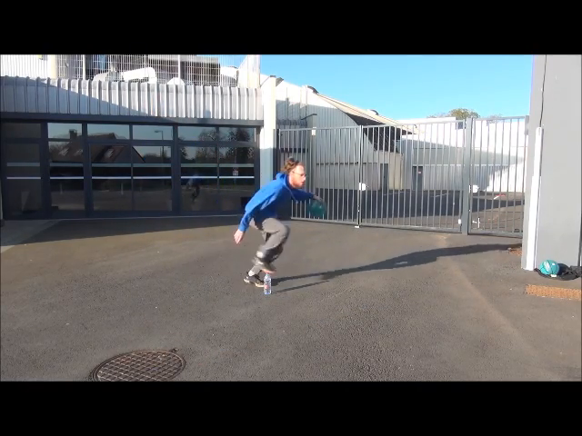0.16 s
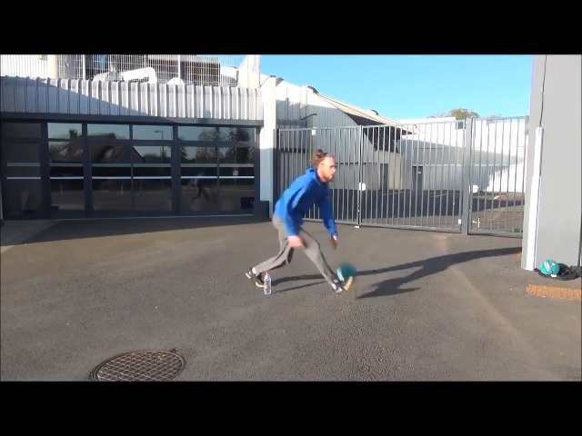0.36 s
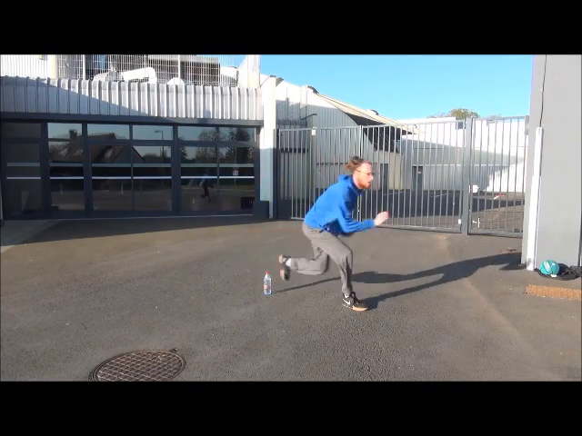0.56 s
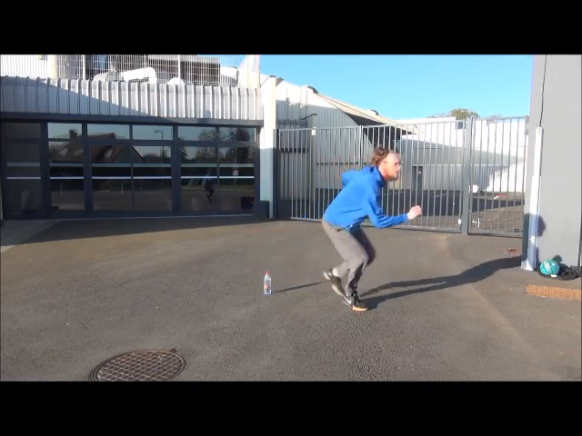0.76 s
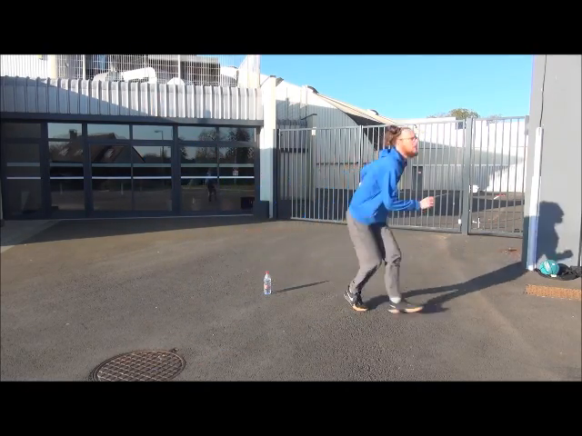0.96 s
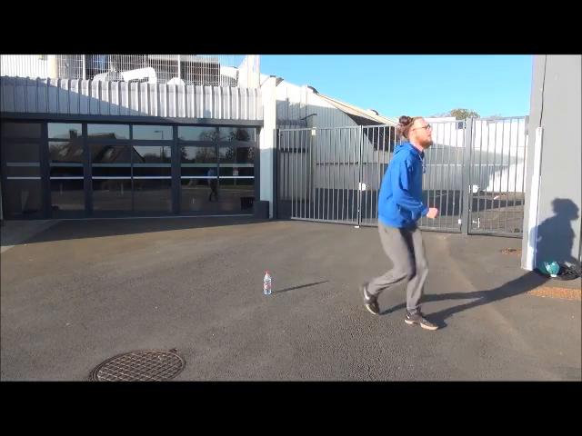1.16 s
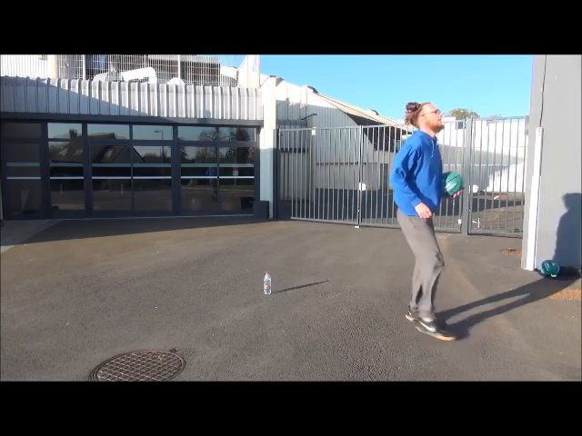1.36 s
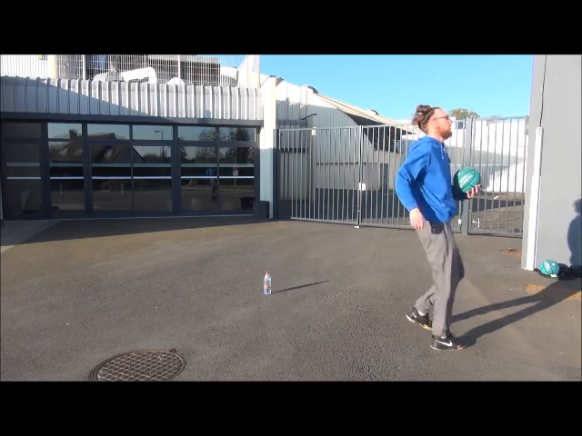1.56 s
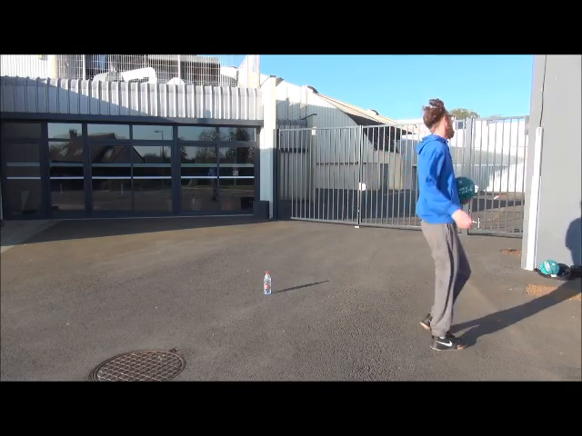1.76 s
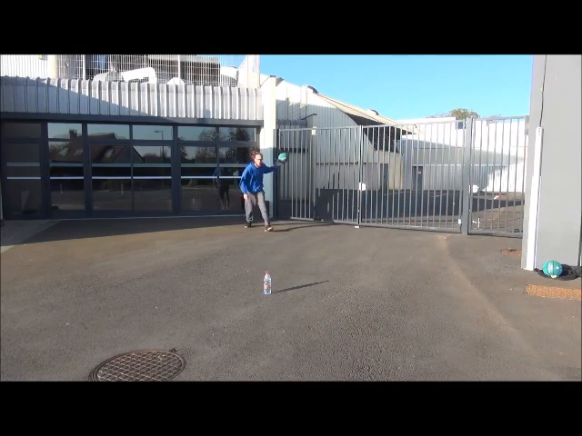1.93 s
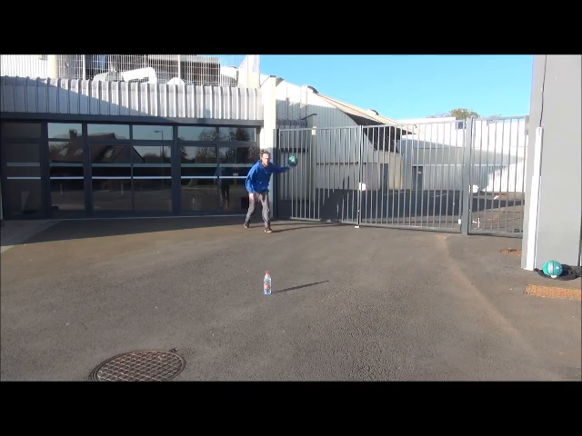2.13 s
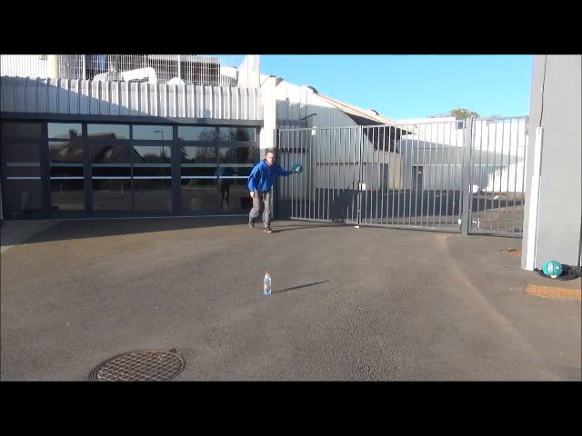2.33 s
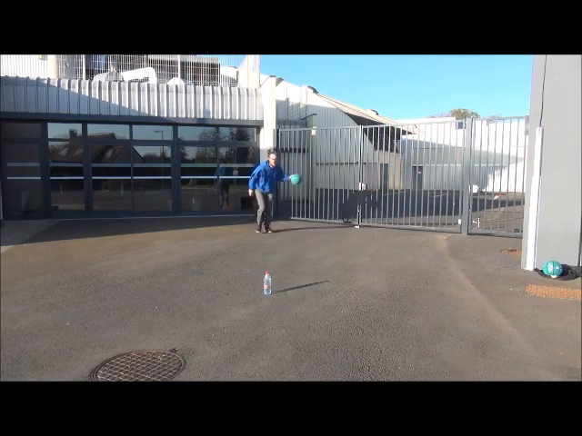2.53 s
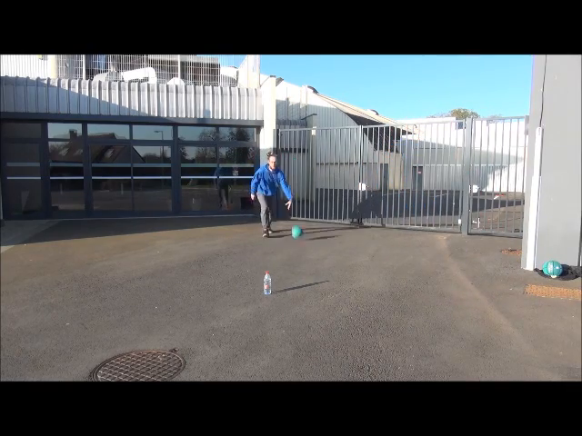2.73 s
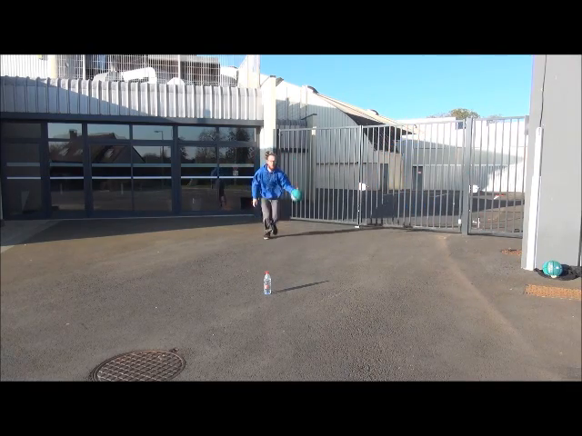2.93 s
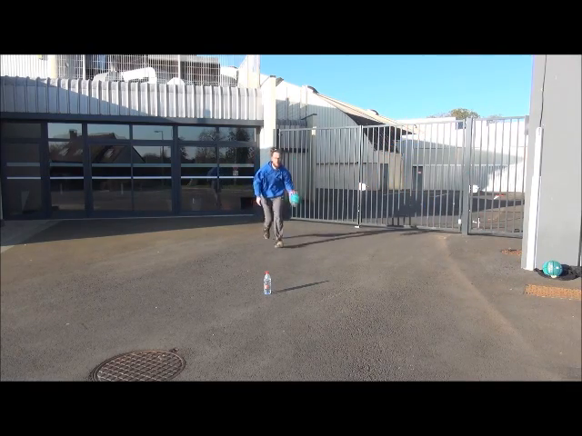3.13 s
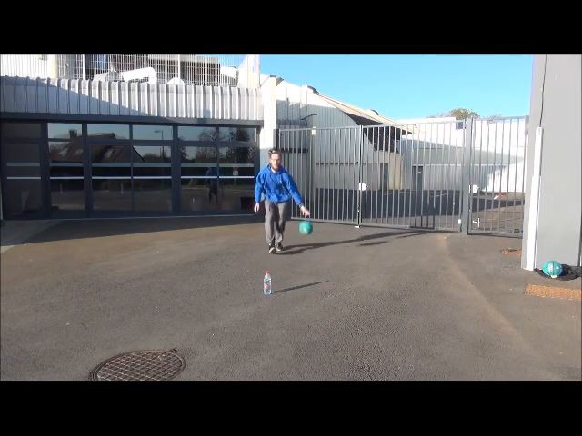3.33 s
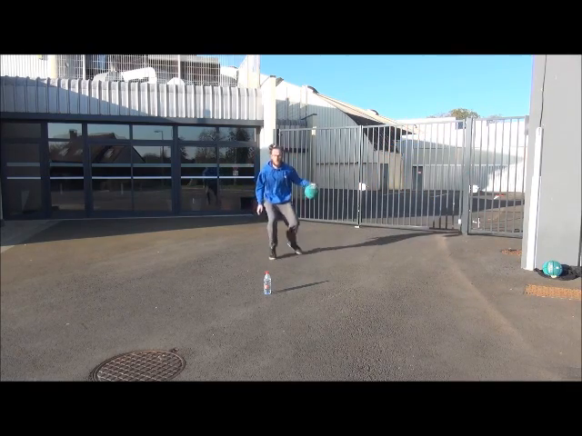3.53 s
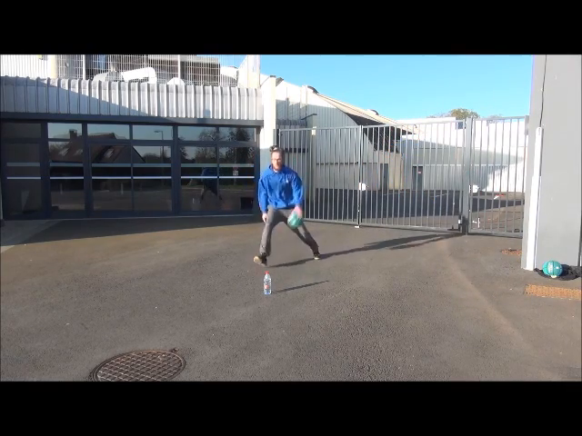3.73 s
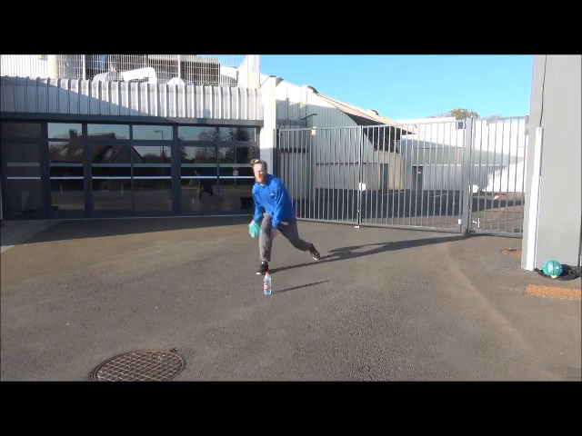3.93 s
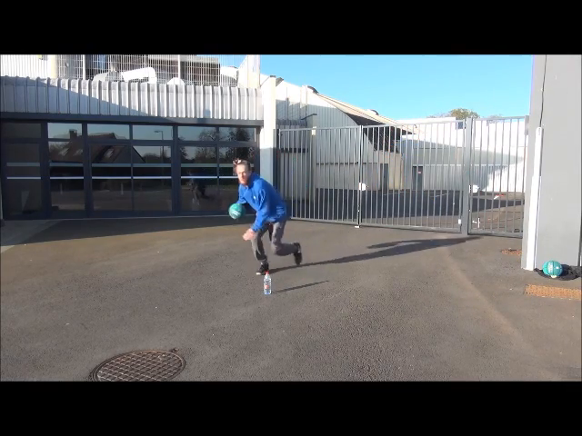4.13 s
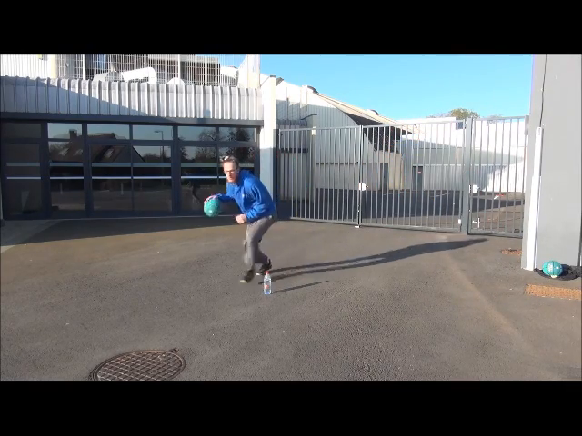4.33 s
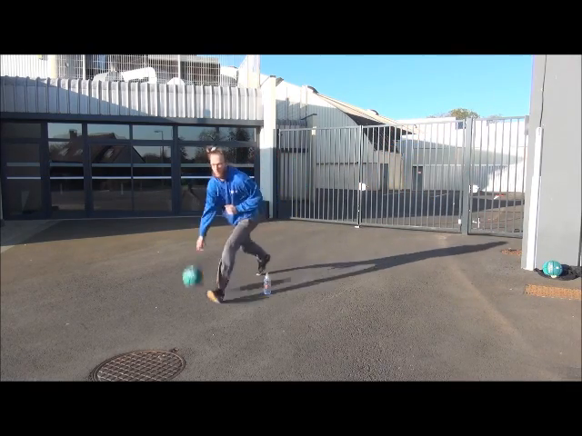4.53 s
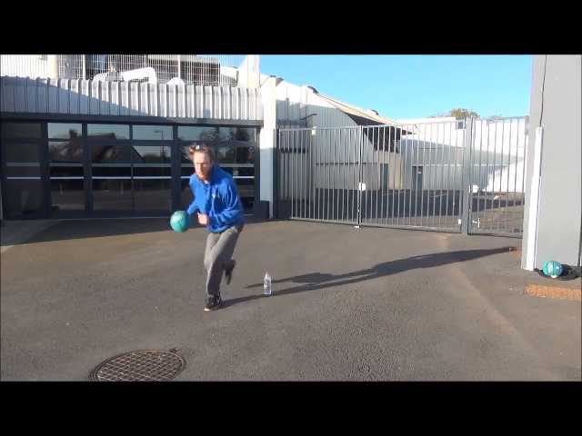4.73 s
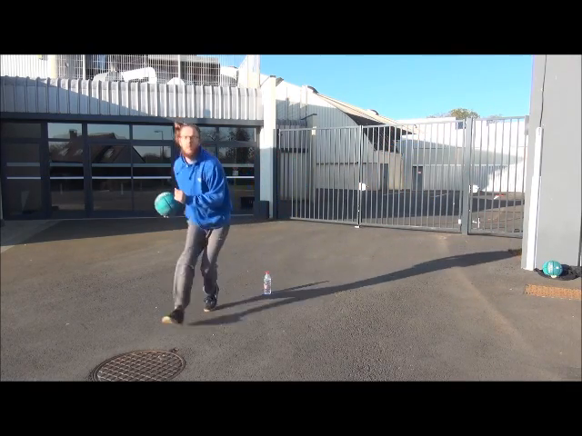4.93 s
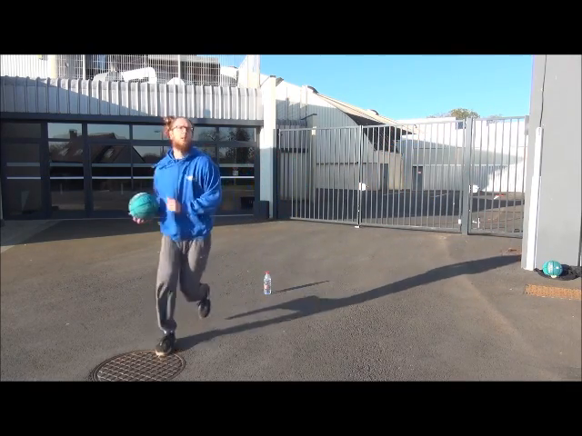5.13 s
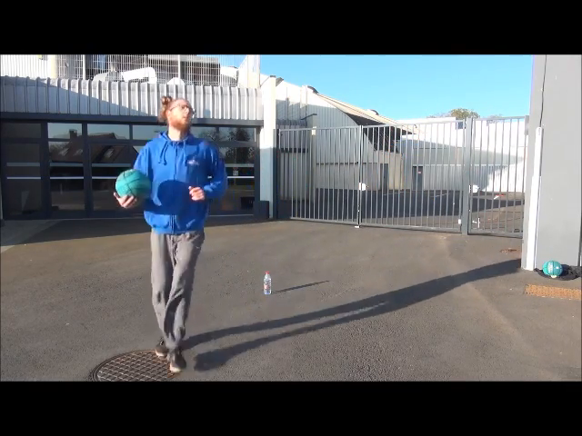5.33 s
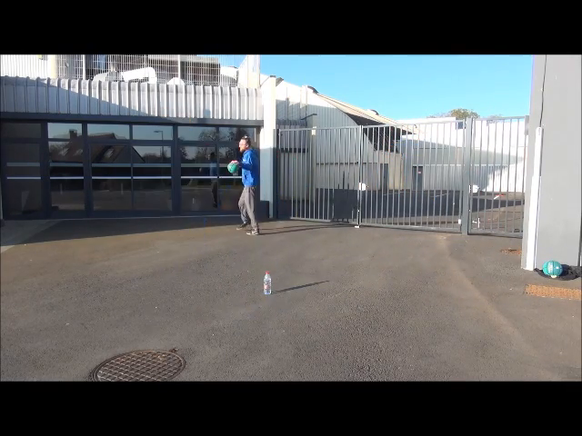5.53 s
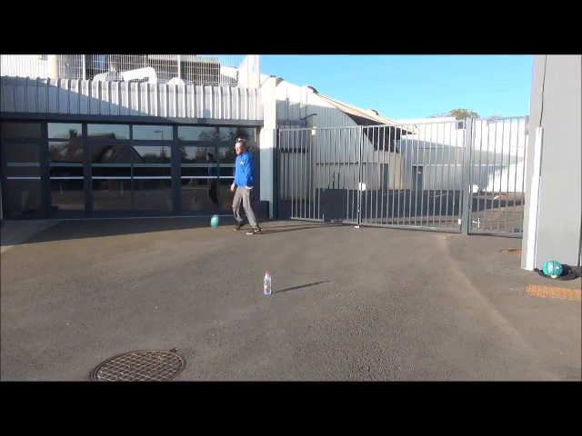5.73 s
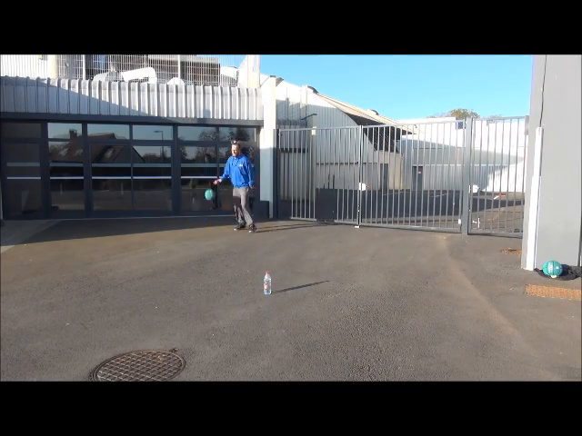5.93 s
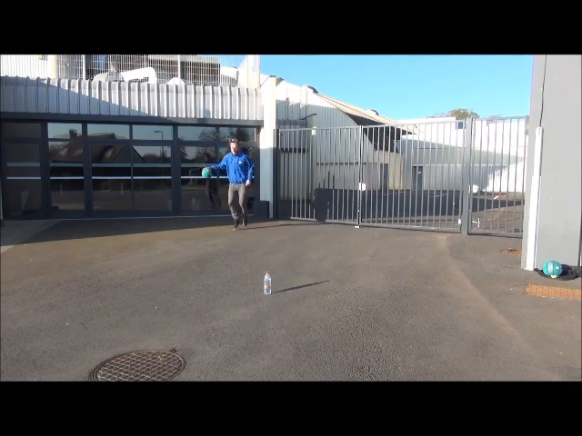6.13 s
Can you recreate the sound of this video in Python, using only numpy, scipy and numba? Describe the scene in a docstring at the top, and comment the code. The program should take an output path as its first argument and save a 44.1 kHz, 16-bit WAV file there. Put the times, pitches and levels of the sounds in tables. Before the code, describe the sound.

A ball is dribbled hard and unevenly on asphalt in an echoing yard, with shoes treading, scraping and briefly squeaking.

```python
"""Basketball in a yard

A basketball is dribbled hard on asphalt. Each bounce slaps, thumps and rings, then echoes from
a barred gate, a glass wall and far buildings. Shoes tread, scrape on grit and squeak. Behind them
a town murmurs, a fan hums and light wind touches the microphone. A limiter flattens the slaps."""
import sys
import numpy as np
from scipy import signal
from scipy.fft import rfft, irfft
from scipy.io import wavfile
from scipy.ndimage import uniform_filter1d
from numba import njit

SR = 44100
rng = np.random.default_rng(int(sys.argv[2]) if len(sys.argv) > 2 else 0)


def pcm_store(signal):
    """Save signal as 16-bit PCM."""
    levels = np.round(np.clip(np.atleast_2d(signal), -1, 1) * 32767)
    wavfile.write(sys.argv[1], SR, levels.astype(np.int16).T)


N = 276948
TIME = np.arange(N) / SR
ONE_SECOND = TIME[:SR]

# Tone curves: how strong the low and high parts of a sound are.
# Each row: frequency in Hz, relative level in dB.
TOWN_TONE = [(15, -49), (25, -34), (59, -18), (112, -15), (145, -14), (169, -7), (336, -4), (391, -7.5),
             (545, -4.5), (930, -5.5), (2270, -11.5), (3320, -12.5), (4180, -16.5), (5530, -19),
             (11000, -33.5), (14300, -114), (22000, -120)]  # distant traffic
RUSH_TONE = [(25, -8), (70, -10.5), (140, 3.5), (240, 0), (400, -9.5), (1000, -30.5), (4000, -46)]  # wind rushing past
BUFFET_TONE = [(25, -14), (45, -9), (75, -1), (105, 0.5), (160, -25), (500, -46)]  # air swirling on the microphone
YARD_TONE = [(60, -19), (130, 11), (250, 0.5), (500, -2.5), (1000, -2.5), (2000, -3.5), (4000, -2.5),
             (7000, -4), (11000, 0.5)]  # the blended echoes of the yard
FAR_TONE = [(150, -2), (500, -16), (740, 4.5), (950, -8), (1270, 4.5), (1700, -3.5), (2500, -12.5),
            (8000, -15.5)]  # the echo from far buildings
GATE_TONE = [(200, -22), (1000, 2), (2500, 2), (4000, 1.5), (8000, 4.5), (11000, 5.5)]  # the echo from the gate's bars
SOLE_TONE = [(40, -7), (120, 14), (260, 11), (500, -8), (1200, -23), (4000, -42)]  # a shoe landing
SCRAPE_TONE = [(100, -36), (300, -19.5), (480, 2.5), (620, -1), (1200, 2.5), (2000, 1.5), (4000, -4),
               (7000, -14), (11000, -25.5)]  # grit under a shoe
SLAP_TONE = [(150, -55), (500, -10), (1300, 6.5), (2400, 0.5), (4000, -2.5), (6000, -16), (8000, -18.5),
             (11000, -22), (16000, -58)]  # rubber hitting asphalt
CRUNCH_TONE = [(40, -22), (120, -24), (300, 6), (800, 3), (1400, -7.5), (2500, -6.5), (4000, -18.5),
               (7000, -26.5), (11000, -37)]  # grit under the ball
ALL_ROUND_TONE = [(50, -18), (130, 1), (260, 0.5), (400, -3), (550, -3), (780, 4), (980, 2.5), (1260, 1),
                  (1700, -2.5), (2900, -7.5), (4000, -11), (7000, -12), (11000, -34)]  # the ball, averaged over all directions
FRAME_TONE = [(200, -16), (1200, -1.0), (4000, -5.0), (11000, 0.5)]  # echo from the window frames
RECESS_TONE = [(100, 2.5), (300, 1.5), (1200, -7.5), (4000, -25.5), (11000, -28)]  # the wall's recess

# How much two close microphones differ. Each row: frequency in Hz, unshared against shared sound in dB.
STEREO_DIFFERENCE = [(60, -13.5), (500, -14), (2000, -16.5), (4000, -17), (8000, -6), (11000, -7)]
# How long the yard echoes. Each row: frequency in Hz, seconds to fade by 60 dB.
YARD_FADE = [(100, 0.72), (400, 2.44), (1200, 1.28), (4000, 0.89), (10000, 0.76)]
# Gusts of wind. Each row: peak time in seconds, half width in seconds, rush in dB, buffeting in dB.
WIND_GUSTS = [(0.88, 0.097, -49.5, -59), (1.47, 0.14, -44.5, -66), (2.7, 0.06, -46.5, -66),
              (4.25, 0.46, -43.5, -48), (4.73, 0.11, -45, -42.5), (5.6, 0.043, -37, -52),
              (5.77, 0.11, -36.5, -48), (6.13, 0.14, -42, -54)]
# Dull low bumps. Each row: start in seconds, length in seconds, pitch in Hz, level in dB.
LOW_BUMPS = [(5.548, 0.022, 164, -28.5), (5.572, 0.042, 169, -27.5)]

# Three stretches of the scene. "Pan" means left level minus right level.
# Each row: start in seconds, the shoes' starting pan in dB, its drift in dB per second, town level in dB.
STRETCHES = [(0, -1, -3, -45), (1.95, 1, 0.5, -47), (5.52, 1.5, -1, -44.5)]
# Footfalls and catches. Each row: start in seconds, thud level in dB, grit level in dB.
FOOTFALLS = [(0.408, -38, -66), (1.132, -37.5, -44), (1.51, -35.5, -40), (2.128, -37.5, -64),
             (3.684, -45.5, -36.5), (3.89, -33, -42), (4.591, -12.5, -36), (5.112, -27.5, -30.5),
             (5.529, -25, -44)]
# Soles sliding on grit. Each row: peak time, rise and fall in seconds, level in dB,
# brightness in dB per octave.
SHOE_SLIDES = [(0.19, 0.059, 0.018, -45, 4), (1.62, .004, 0.06, -29, -3), (1.663, .01, .025, -31, -0.5),
               (1.712, 0.016, 0.075, -32.5, -1), (1.795, .012, 0.035, -32.5, -6),
               (1.87, .03, 0.058, -41, -2), (3.19, 0.0029, 0.025, -42.5, 17),
               (3.237, 0.0043, 0.009, -34.5, 14), (3.471, 0.0045, 0.0075, -40, 16),
               (4.129, 0.022, 0.019, -37.5, 5.5), (5.119, 0.0036, 0.017, -42.5, 18),
               (5.252, 0.00092, 0.0028, -39.5, 8), (5.78, .06, 0.059, -53.5, 10)]
# Rubber squeaks. Each row: start and length in seconds, first and last pitch in Hz,
# roughness from 0 to 1, level in dB.
SHOE_SQUEAKS = [(1.236, 0.01, 1120, 950, 0.34, -37), (3.184, 0.046, 2960, 3220, 0.04, -42.5),
                (3.2, 0.039, 3400, 3640, .02, -46), (3.744, .011, 1050, 900, 0.37, -33.5),
                (4.119, 0.026, 1633, 1710, 0.27, -23.5)]

# The notes a ball rings with. Each row: pitch in Hz, relative level in dB, seconds to fade by 60 dB.
THUMP_NOTES = [(129.5, -23, 0.073), (200, -10.5, 0.04), (280, -16, 0.065), (380.5, -15.5, 0.051)]  # slow swings of the squashed ball
SHELL_NOTES = [(520, -43, 0.02), (669, -18, 0.05), (837, -10.5, 0.036), (1013, -4.5, 0.017),
               (1093, -20, 0.035), (1270, -10, 0.04), (1340, -23, 0.017), (1920, -48, .035),
               (2200, -74, 0.028), (4260, -10, 0.02)]  # the rubber shell
AIR_NOTES = [(990, -47, .5), (2890, -47.5, 2.4), (3210, -46, 0.33), (3526, -60, 1.2), (4000, -60, 0.91)]  # the air inside
# The bounces. Each row: start in seconds; relative levels in dB of the whole bounce, its thump, slap
# and air ring; gate, wall and far echo delays in seconds; relative far echo level in dB; pan in dB.
BALL_BOUNCES = [(0.463, -2, 0, -1.5, -7, 0.028, 0.048, 0.18, -19.5, -2.5),
                (2.8527, 1.5, -3.5, 0, -16, .0162, .0296, .2, -28, 2),
                (3.3579, 0, 3, -4, -22, .021, .0362, .205, -34.5, -2),
                (3.9286, 0.5, 4, -2, -6, 0.027, 0.044, 0.19, -26.5, 2),
                (4.5986, 0.5, 9.5, 3.5, 2, 0.048, .0505, .222, -33.5, 1.5),
                (5.8846, 0.5, -5, 4, -10, 0.015, .023, 0.2, -35.5, -2.5)]


def gain(db):
    """Turn decibels into a number to multiply by."""
    return 10 ** (np.asarray(db) / 20)


def stereo(pan_db):
    """Left and right gains; a positive pan is louder on the left."""
    return gain(np.array([[.5], [-.5]]) * pan_db)


def add(out, x, start_s):
    """Mix x into out from the given time on."""
    i = max(int(round(start_s * SR)), 0)
    out[..., i:i + x.shape[-1]] += x[..., :out.shape[-1] - i]


def lookup(curve, hz):
    """Read a curve between its rows, with octaves evenly spaced."""
    row_hz, values = np.transpose(curve)
    return np.interp(np.log(np.maximum(hz, 1)), np.log(row_hz), values)


def soft_filter(x, kind, hz):
    """Let through the "low" or the "high" side of a frequency."""
    return signal.sosfilt(signal.butter(2, hz, kind, fs=SR, output="sos"), x)


def colour(x, tone, size=2048):
    """Give x a tone curve, using a filter that leaves white noise equally strong."""
    cepstrum = irfft(np.log(gain(lookup(tone, np.fft.rfftfreq(size, 1 / SR)))))
    cepstrum[1:size // 2] *= 2  # folding this in half keeps the filter from ringing before a hit
    cepstrum[size // 2 + 1:] = 0
    response = irfft(np.exp(rfft(cepstrum)))
    return signal.fftconvolve(x, response / np.linalg.norm(response))[:len(x)]


def noise(tone, count=N):
    """Steady noise with a tone curve and a strength near 1."""
    return colour(rng.standard_normal(2 * SR + count)[SR:], tone)[-count:]


def burst(tone, fade_s):
    """Noise that starts suddenly and dies away."""
    return colour(rng.standard_normal(SR) * np.exp(-ONE_SECOND / fade_s), tone)


def grit(spread_db):
    """One second of dense, uneven clicks: small stones under rubber."""
    clicks = rng.standard_normal(SR) * gain(spread_db * np.minimum(rng.exponential(size=SR), 5))
    return clicks / np.sqrt(np.mean(clicks ** 2))


def wander(rate_hz):
    """Glide between random values, mostly within -1 to 1."""
    step = int(SR / rate_hz)
    return uniform_filter1d(np.repeat(rng.standard_normal(N // step + 1), step), step)[:N]


def swell(peak_s, width_s):
    """A smooth rise to 1 and back down."""
    return np.exp(-((TIME - peak_s) / width_s) ** 2)


def widen(shared, other):
    """Sound from all around differs between two close microphones mainly in the treble."""
    side = irfft(rfft(other) * gain(lookup(STEREO_DIFFERENCE, np.fft.rfftfreq(N, 1 / SR))), N)
    return np.array([shared + side, shared - side])


def stretches():
    """As each stretch starts, the shoes' left-right position and the town's loudness jump."""
    pan_db, town_db = np.zeros(N), np.zeros(N)
    for start_s, start_pan_db, drift_db_per_s, level_db in STRETCHES:
        now = TIME >= start_s
        pan_db[now] = start_pan_db + drift_db_per_s * (TIME[now] - start_s)
        town_db[now] = level_db
    return pan_db, town_db


def town(level_db):
    """Distant traffic blends into a gently wavering murmur."""
    return widen(noise(TOWN_TONE), noise(TOWN_TONE)) * gain(level_db + .6 * wander(6))


def fan(pitch_hz=138):
    """The blades of a distant fan hum faintly; the hum swells once."""
    hz = pitch_hz * (1 + .012 * wander(16))
    blades = np.sqrt(2) * np.sin(2 * np.pi * np.cumsum(hz) / SR)
    level = np.hypot(gain(-61), gain(-45) * swell(peak_s=4.32, width_s=0.66))
    return blades * level * gain(1.5 * wander(5))


def wind():
    """Gusts rush past and buffet the microphone."""
    rush_level, buffet_level = gain(-57), gain(-61)  # the calm between gusts
    for peak_s, width_s, rush_db, buffet_db in WIND_GUSTS:
        gust = swell(peak_s, width_s)
        rush_level = np.hypot(rush_level, gain(rush_db) * gust)
        buffet_level = np.hypot(buffet_level, gain(buffet_db) * gust)
    rush = widen(noise(RUSH_TONE), noise(RUSH_TONE)) * rush_level
    buffeting = widen(noise(BUFFET_TONE), noise(BUFFET_TONE)) * buffet_level
    puffs = gain(2 * wander(22))
    return stereo(0.48) * (rush + buffeting) * puffs


def low_bumps():
    """Soft low bumps, a few waves long, with no click."""
    out = np.zeros(N)
    for start_s, length_s, hz, db in LOW_BUMPS:
        count = int(length_s * SR)
        add(out, gain(db) * np.hanning(count) * np.sin(2 * np.pi * hz * TIME[:count]), start_s)
    return out


def yard_echoes(x, build_s=0.029, bands=9):
    """Countless echoes blend into a tail that lasts longest in the low middle range."""
    t, hz = TIME[:2 * SR], np.fft.rfftfreq(2 * SR, 1 / SR)
    centres_hz = np.geomspace(60, 12000, bands)
    early_boost = 1 + gain(-2.5) * np.exp(-t / 0.043)  # the nearest walls answer first and strongest
    build_up = 1 - np.exp(-(t / build_s) ** 2)
    echoes = []
    for _ in range(2):
        spectrum = rfft(noise(YARD_TONE, count=2 * SR))
        tail = np.zeros(2 * SR)
        for centre_hz, weights in zip(centres_hz, np.eye(bands)):
            band = irfft(spectrum * lookup(np.c_[centres_hz, weights], hz))
            tail += band * gain(-60 * t / lookup(YARD_FADE, centre_hz))
        echoes.append(signal.fftconvolve(x, gain(-52) * tail * early_boost * build_up)[:N])
    return widen(*echoes)


def scattered_echo(x, tone, fade_s):
    """An uneven surface sends back many small echoes close together."""
    response = burst(tone, fade_s)
    return signal.fftconvolve(x, response / np.linalg.norm(response))[:len(x)]


def wall_echo(hit, pulse, recess_delay_s=0.0062):
    """Glass mirrors the slap, the frames scatter it, and the bass returns later from a recess."""
    out = gain(-13) * hit + gain(-6.5) * scattered_echo(pulse, FRAME_TONE, fade_s=0.0039)
    add(out, gain(-16) * scattered_echo(pulse, RECESS_TONE, fade_s=0.0086), recess_delay_s)
    return out


def shoes():
    """Soles thud on the asphalt and drag loose grit over it."""
    out = np.zeros(N)
    for start_s, thud_db, grit_db in FOOTFALLS:
        thud = burst(SOLE_TONE, fade_s=0.0062)
        tick = colour(grit(spread_db=4) * np.exp(-ONE_SECOND / 0.0053), SCRAPE_TONE)
        add(out, gain(thud_db) * thud + gain(grit_db) * tick, start_s)
    for peak_s, rise_s, fall_s, db, brightness in SHOE_SLIDES:
        t = ONE_SECOND - 3 * rise_s  # zero at the loudest moment
        slide = np.where(t < 0, np.exp(-(t / rise_s) ** 2), np.exp(-abs(t) / fall_s))
        tone = [(hz, row_db + brightness * np.log2(hz)) for hz, row_db in SCRAPE_TONE]
        add(out, gain(db) * colour(grit(spread_db=4) * slide, tone), peak_s + t[0])
    return out


def squeaks():
    """A sole sticks and slips: evenly for a squeak, unevenly for a rasp."""
    out = np.zeros(N)
    for start_s, length_s, first_hz, last_hz, roughness, db in SHOE_SQUEAKS:
        count = int(length_s * SR)
        hz = np.linspace(first_hz, last_hz, count) * (1 + roughness * wander(1500)[:count])
        add(out, gain(db) * np.hanning(count) * np.sin(2 * np.pi * np.cumsum(hz) / SR), start_s)
    return out


def ring(notes, wave, detune):
    """Fading notes; detune sets how far each blow shifts their pitches by chance."""
    out = np.zeros(SR)
    for hz, db, fade_s in notes:
        pitch_hz = hz * (1 + detune * rng.standard_normal())
        out += gain(db - 60 * ONE_SECOND / fade_s) * wave(2 * np.pi * pitch_hz * ONE_SECOND)
    return out


def all_round_pulse(thump_db, slap_db):
    """The ball's tone differs with direction, so the yard as a whole gets a mostly smooth pulse."""
    tilt = [(250, thump_db), (900, 0), (2500, slap_db)]
    tone = [(hz, db + .5 * lookup(tilt, hz)) for hz, db in ALL_ROUND_TONE]
    return gain(18) * colour(signal.unit_impulse(SR), tone)


def bounce(thump_db, slap_db, air_db, contact_s=0.0102, sway_hz=7.3, sway_depth=0.74):
    """The ball slaps the ground and squashes; its shell and the air inside ring."""
    impact = gain(15.5) * signal.unit_impulse(SR)
    impact += gain(0.5) * grit(spread_db=-3.5) * np.exp(-ONE_SECOND / 0.0019)
    slap = soft_filter(colour(impact, SLAP_TONE), "high", hz=650)
    crunch = gain(-12.5) * colour(grit(spread_db=6) * np.exp(-ONE_SECOND / 0.009), CRUNCH_TONE)
    shell_db = 0.9 + 0.62 * slap_db  # a harder slap rings the shell more
    shell = gain(shell_db) * ring(SHELL_NOTES, np.cos, detune=0.057)
    squash = -ring(THUMP_NOTES, np.sin, detune=0.07)
    thump = soft_filter(squash, "high", hz=90)  # a small ball gives off little bass
    out = gain(slap_db) * slap + crunch + shell + gain(thump_db) * thump
    add(out, gain(-7.5) * soft_filter(shell, "low", hz=1400), contact_s)  # lift-off flicks the shell
    # Spin turns the ball's loud and quiet sides past the listener.
    sway = 1 + sway_depth * np.cos(2 * np.pi * sway_hz * (ONE_SECOND + 0.024))
    return out + gain(air_db) * sway * ring(AIR_NOTES, np.sin, detune=0)


def dribble():
    """The bounces with their separate echoes, and the sound they send into the yard."""
    heard, into_yard = np.zeros((2, N)), np.zeros(N)
    for start_s, db, thump_db, slap_db, air_db, gate_s, wall_s, far_s, far_db, pan_db in BALL_BOUNCES:
        hit = gain(db) * bounce(thump_db, slap_db, air_db)
        pulse = gain(db) * all_round_pulse(thump_db, slap_db)
        gate = gain(-17) * scattered_echo(pulse, GATE_TONE, fade_s=0.0018)
        wall = gain(-7.5) * wall_echo(hit, pulse)
        buildings = gain(far_db - 6.5) * scattered_echo(hit, FAR_TONE, fade_s=0.035)
        add(heard, stereo(pan_db) * hit, start_s)
        add(heard, stereo(pan_db) * gate, start_s + gate_s)
        add(heard, stereo(pan_db - 0.6) * wall, start_s + wall_s)
        add(heard, stereo(-2.2) * buildings, start_s + far_s - .008)  # this long echo starts early
        add(into_yard, gain(1.08) * (pulse + gain(-8) * hit), start_s)
    return heard, into_yard


def scene():
    """Ball and shoes in the open yard; the echoing walls stand more to the right."""
    ball, into_yard = dribble()
    feet_pan_db, town_db = stretches()
    feet = shoes() + squeaks()
    echoes = stereo(-0.56) * yard_echoes(into_yard + gain(6) * feet)
    background = town(town_db) + fan() + wind() + low_bumps()
    return background + echoes + stereo(feet_pan_db) * feet + ball


@njit
def follow_peaks(peaks, decay):
    """A level that jumps up to each peak and then sinks."""
    out, level = np.empty(len(peaks)), 0.
    for i in range(len(peaks)):
        level = max(peaks[i], level * decay)
        out[i] = level
    return out


def record(dry, ceiling=0.62, release_s=0.0079, low_hz=55, top_hz=10900):
    """A small camera turns loud peaks down quickly, thins the bass and cuts the highest treble."""
    level = follow_peaks(abs(dry).max(axis=0), np.exp(-1 / (release_s * SR)))
    limited = dry * ceiling / np.maximum(level, ceiling)
    thinned = soft_filter(limited, "high", low_hz)
    return signal.sosfilt(signal.ellip(8, .2, 70, top_hz, fs=SR, output="sos"), thinned)


dry = scene()
out = record(dry)
pcm_store(out)
```